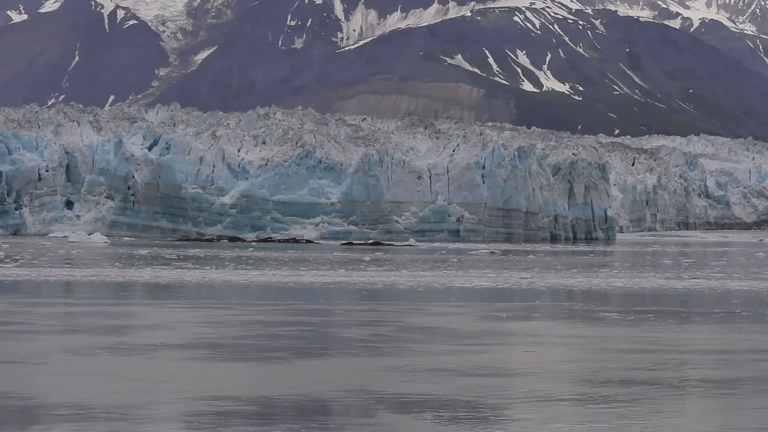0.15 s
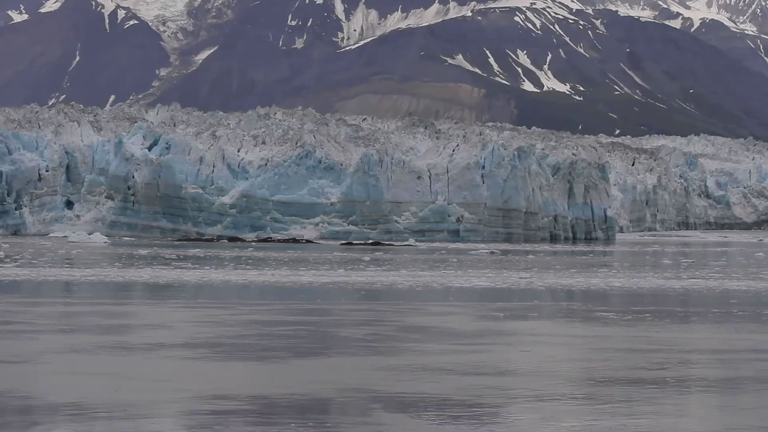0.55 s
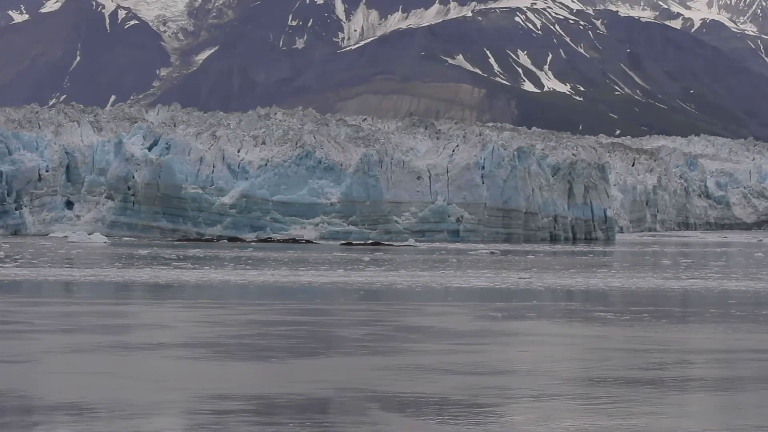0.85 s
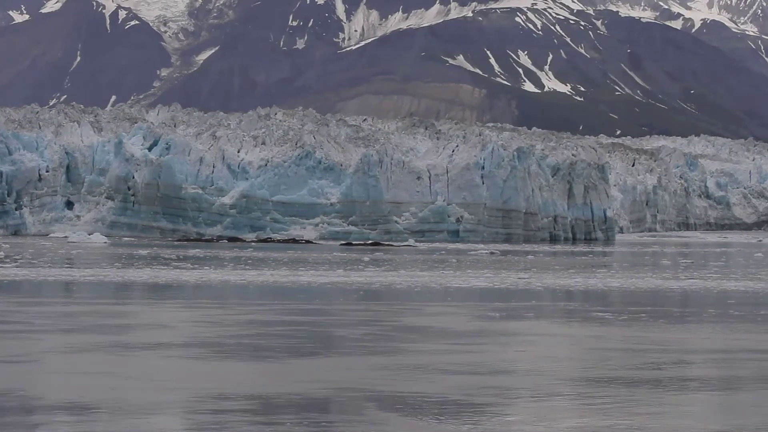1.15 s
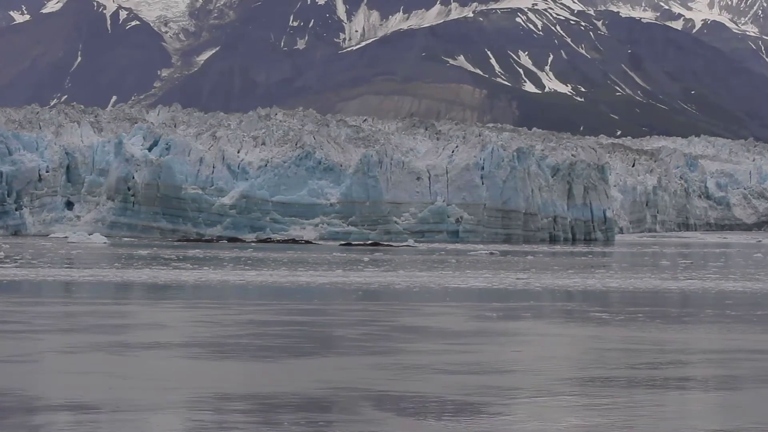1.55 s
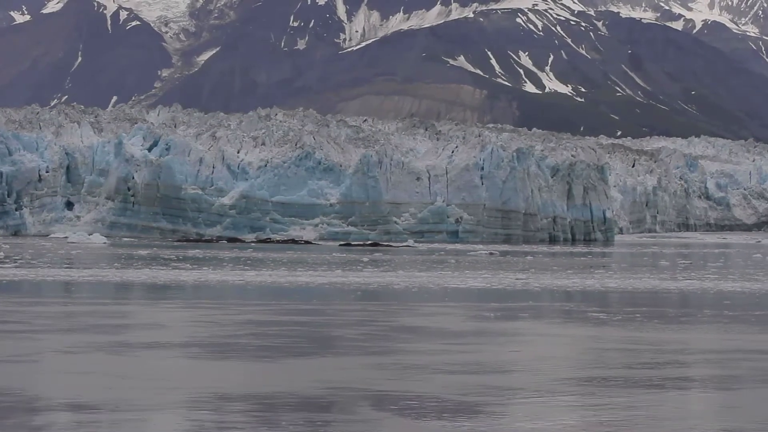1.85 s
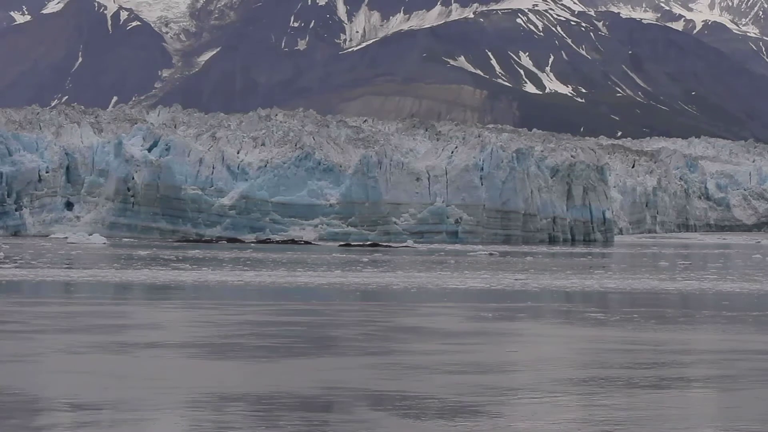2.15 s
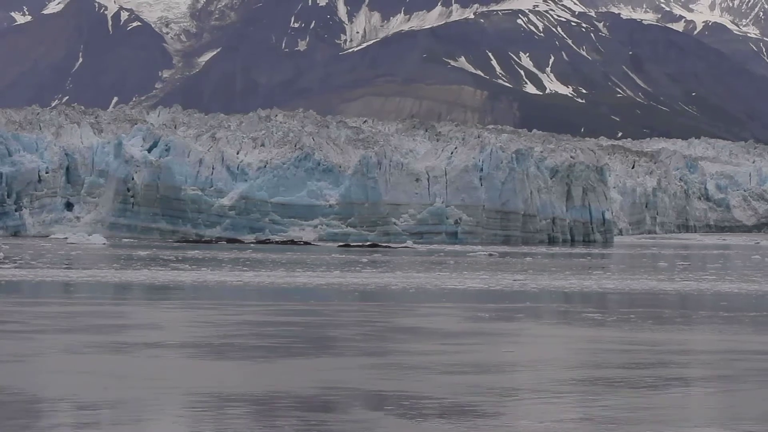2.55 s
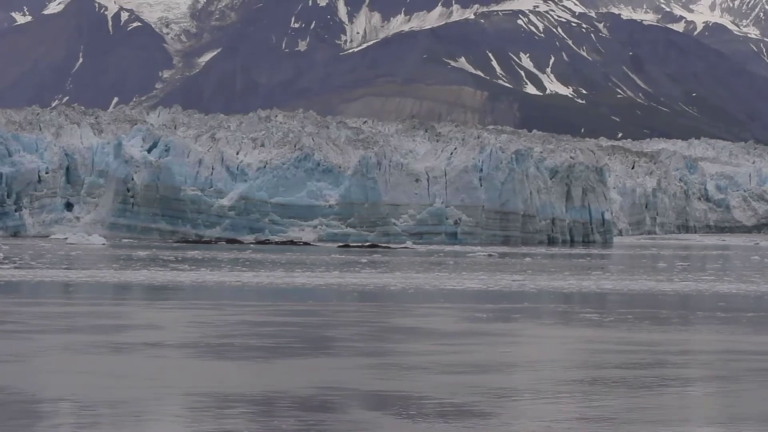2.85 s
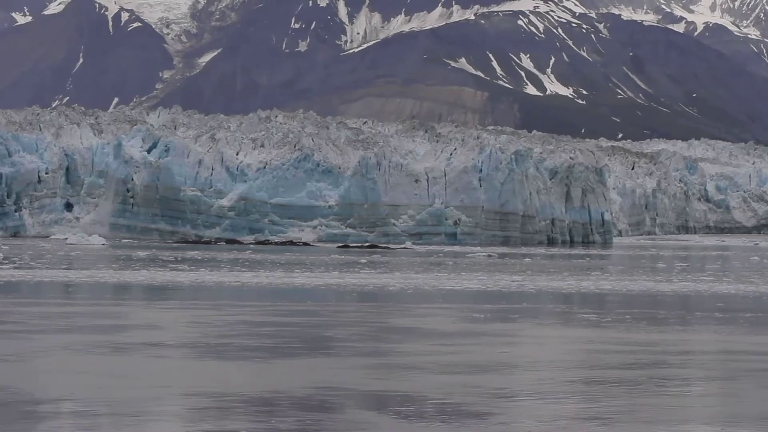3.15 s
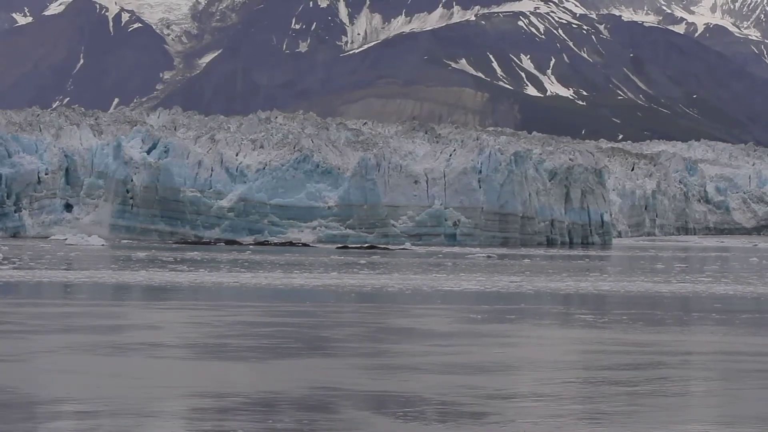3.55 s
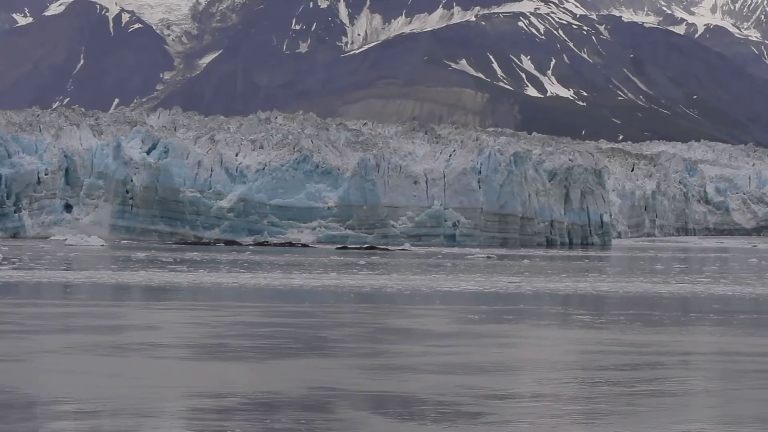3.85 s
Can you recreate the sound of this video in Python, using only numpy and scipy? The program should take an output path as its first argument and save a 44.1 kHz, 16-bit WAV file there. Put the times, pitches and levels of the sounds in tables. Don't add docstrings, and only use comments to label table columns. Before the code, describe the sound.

Glacier ice cracks and collapses in a deep roaring crash after a fading wash of water

```python
import sys
import numpy as np
from scipy import signal
from scipy.io import wavfile
from scipy.ndimage import uniform_filter1d

SR = 44100
rng = np.random.default_rng(int(sys.argv[2]) if len(sys.argv) > 2 else 0)


def makeup_ratio(level_db):
    decades = np.asarray(level_db, float) / 20
    return 10 ** decades


def wav_out(sig):
    wavfile.write(sys.argv[1], SR, np.round(np.clip(np.atleast_2d(sig).T, -1, 1) * 32767).astype(np.int16))


N = 176400
STORE_HZ = 11024

# time_s, level_db, near_roll_share (0-1)
WASH_LEVELS = [(0, -45, 0.63), (.08, -42.5, 0.76), (.6, -44.5, 0.68), (.78, -43, 0.72), (.93, -46.5, 0.6),
               (1, -48, 0.57), (1.08, -51, 0.69), (1.17, -54, 0.8), (1.3, -56, 0.8), (1.36, -50, 0.78),
               (1.6, -52.5, 0.5), (1.9, -55, 0.31), (2.3, -55.5, 0.25), (2.74, -54.5, 0.4)]
# pitch_hz, level_db (per Hz)
ROLL_TONE = [(21, -44), (35, -21), (113, -8), (160, -1.5), (459, -1), (2060, -13.5), (3700, -34),
             (4810, -70), (8140, -120)]
# pitch_hz, level_db (per Hz)
CALM_TONE = [(20, -27), (45, -0.5), (80, -2.5), (380, -7.5), (750, -4.5), (1060, -6), (2200, -10),
             (3700, -19), (4800, -61)]
# pitch_hz, likeness (0-1)
WASH_LIKENESS = [(60, 0.81), (380, 0.91), (2380, 0.36), (15000, 0.068)]
# start_s, peak_db, pitch_hz, length_cycles
BOOM_EVENTS = [(0.477, -38, 484, 11), (0.593, -39, 248, 4.4), (0.742, -33, 402, 6), (0.751, -43, 198, 4.2),
               (0.81, -42, 166, 3.65), (0.885, -41, 206, 4.8), (2.765, -42.5, 132.5, 4.4),
               (3.333, -24, 50.1, 6.5), (3.458, -37.5, 51.8, 6.5), (2.808, -46, 126.6, 4.9),
               (2.925, -45, 184, 5.9), (3.062, -36, 145.5, 5.7), (3.109, -25.5, 162.5, 5.4),
               (3.158, -25, 152, 2.6), (3.19, -29, 582, 16.2), (3.255, -24, 402.3, 10), (3.36, -27, 228, 7),
               (3.266, -22, 200, 6), (3.354, -25, 151, 5), (3.575, -23.5, 164.4, 5),
               (3.326, -23.5, 54.4, 1.6), (3.669, -29, 272.4, 16), (3.686, -24, 186.3, 6),
               (3.79, -26.5, 198.7, 7), (3.275, -37, 1910, 45), (3.226, -35.5, 188, 4.4),
               (3.26, -11, 140, 4.84), (3.288, -20, 82.7, 2.6), (3.317, -18.5, 142.8, 3.6),
               (3.346, -20.5, 69.8, 2.7), (3.368, -15.5, 117.7, 2.3), (3.4, -17.5, 115.3, 1.8),
               (3.424, -15.5, 137.7, 2.63), (3.467, -19, 115, 4.57), (3.486, -15, 146.6, 4.5),
               (3.519, -16.5, 94.2, 1.8), (3.548, -21, 130, 4.66), (3.646, -14.5, 105.2, 3),
               (3.675, -20, 121, 3.9), (3.723, -20.5, 104.5, 4.4), (3.772, -26, 109.2, 3.3),
               (3.818, -20, 103.6, 2.1), (3.879, -25, 80, 2.47), (3.95, -24.5, 96, 2.4)]
# start_s, peak_db, fade_s (by 60 dB), left_over_right_db, dullness_db (per octave)
CRACK_EVENTS = [(.736, -37.5, 0.52, 1.5, 0.5), (.849, -41.5, 0.38, 0, 3.5), (.897, -37, 0.26, 2, -1),
                (1.064, -44.5, 0.62, 2, 2), (1.375, -43, 0.3, -3, 2.5), (2.143, -45, 0.35, -7, -5.5),
                (2.762, -31.5, 0.3, 4.5, 2.5), (2.803, -35, 0.36, 5, -2.3), (2.813, -35, 0.37, 3.5, -2),
                (2.847, -40, 0.45, -4, 0), (2.924, -30.5, 0.3, 2.5, -1), (2.96, -35, 1, 9, -0.1),
                (3.065, -41, 0.43, 1, 2), (3.115, -33, 0.52, 4, 6.5), (3.159, -24.5, 0.33, 6.5, -0.8),
                (3.199, -23, 0.47, 4.5, 3), (3.229, -31, 0.29, 1, 1), (3.26, -19.5, 0.26, 3, 1.5),
                (3.312, -25, 0.63, -0.5, 5), (3.434, -24, 0.36, 4.5, 0.2), (3.474, -27, .3, 1, -1.5),
                (3.499, -24, .5, 2.5, 2.5), (3.631, -27, 0.47, -2.5, 1.5), (3.836, -27.5, 0.3, 0.5, 2)]
# pitch_hz, level_db (per Hz)
CRACK_TONE = [(40, -28.5), (110, -11.5), (180, -1), (330, 0.5), (480, -3), (930, -3.5), (1800, -16),
              (3700, -32), (4800, -60)]
# pitch_hz, likeness (0-1)
FALL_LIKENESS = [(60, 0.9), (300, 0.88), (950, 0.72), (3000, 0.6)]
# start_s, peak_db, length_s
TICK_EVENTS = [(.849, -35, .0004), (0.9, -31, 0.00055), (1.382, -40.5, 0.001), (2.761, -35, 0.00084),
               (2.804, -30.5, 0.00054), (2.926, -29, .0006), (3.158, -22.5, .0008), (3.206, -22, 0.00052),
               (3.313, -20.5, .0006), (3.427, -23, 0.0008), (3.631, -23, 0.00018), (3.838, -23, 0.00053),
               (3.851, -25, 0.0006)]
# time_s, level_db, left_over_right_db
ROAR_LEVELS = [
    (3.06, -64, -10),
    (3.15, -45.5, 7),
    (3.17, -36, 5.5),
    (3.2, -35, 5),
    (3.3, -33.5, 6),
    (3.55, -33.5, 3.5),
    (3.7, -34.5, 1),
    (3.9, -33.5, 1.5),
    (4, -31.5, 1.5),
]
# pitch_hz, level_db (per Hz)
RUBBLE_TONE = [(21, -44), (35, -14), (69, -5.5), (170, -5.5), (580, -14.5), (891, -19.5), (963, -26.5),
               (1170, -21.5), (3700, -39.5), (4810, -75), (8140, -120)]
# time_s, from_hz, to_hz
DROPPED_BANDS = [(2.892, 3350, 4000), (3.049, 3300, 4000), (3.101, 2950, 4000), (3.205, 2150, 2260),
                 (3.205, 2820, 2920), (3.257, 2150, 2260), (3.257, 2480, 2650), (3.257, 3050, 3200),
                 (3.31, 2900, 3000), (3.31, 920, 990), (3.31, 1330, 1430), (3.31, 2450, 2650),
                 (3.362, 910, 980), (3.362, 2750, 4000), (3.414, 1200, 1290), (3.414, 3450, 4000),
                 (3.466, 1200, 1290), (3.519, 3000, 4000), (3.571, 3000, 4000), (3.623, 3000, 3200),
                 (3.675, 2850, 4000), (3.727, 1240, 1330), (3.78, 2950, 4000), (3.832, 940, 1020),
                 (3.832, 1300, 1400), (3.832, 2130, 2230), (3.884, 940, 1020), (3.989, 2450, 4000),
                 (4.04, 2450, 4000)]


def evened(x):
    return x / np.sqrt(np.mean(x ** 2) + 1e-20)


def read(points, hz):
    table_hz, value = np.transpose(points)
    return np.interp(np.log(hz + 1), np.log(table_hz + 1), value)


def curve(table, column):
    rows = np.array(table)
    return np.interp(np.arange(N) / SR, rows[:, 0], rows[:, column])


def panned(left_over_right_db):
    return makeup_ratio(np.array([left_over_right_db / 2, -left_over_right_db / 2]))


def rush(tone, likeness, patchy_db, flicker_db, dull_db=0, length=N):
    frames = length // 256 + 5
    hz = np.fft.rfftfreq(1024, 1 / SR)[:120]
    a, b, c, d, patch, flicker = rng.standard_normal((frames, len(hz), 6)).T
    patch = uniform_filter1d(uniform_filter1d(patch, size=6, axis=0), size=10, axis=1)
    flicker = uniform_filter1d(uniform_filter1d(flicker, size=60, axis=0), size=3, axis=1)
    drift = makeup_ratio(patchy_db * evened(patch) + flicker_db * evened(flicker))

    octaves_up = np.log2(np.maximum(hz, 300) / 800)
    shape = makeup_ratio(read(tone, hz) - dull_db * octaves_up) * (hz > 20)
    middle = (hz > 300) & (hz < 2500)
    middle_share = np.sum(shape[middle] ** 2) / np.sum(shape ** 2)

    same = np.clip(read(likeness, hz), -1, 1)[:, None]
    left = a + 1j * b
    right = same * left + np.sqrt(1 - same ** 2) * (c + 1j * d)
    spectrum = np.zeros((2, 513, frames), complex)
    spectrum[:, :len(hz)] = np.array([left, right]) * shape[:, None] * drift
    noise = signal.istft(spectrum, nperseg=1024, noverlap=768)[1][:, :length]
    return evened(noise) / np.sqrt(middle_share)


def wash():
    near = np.clip(curve(WASH_LEVELS, 2), 0, 1)
    roll = rush(ROLL_TONE, WASH_LIKENESS, 0.76, 0.95)
    calm = rush(CALM_TONE, WASH_LIKENESS, 1.1, 0.59)
    blend = np.sqrt(near) * roll + np.sqrt(1 - near) * calm
    return makeup_ratio(curve(WASH_LEVELS, 1)) * blend * panned(0.57)[:, None]


def booms():
    glide, pan_db = 0.065, 3.5
    echo_fade_s, echo_likeness, echo_db = .3, 0.69, -11.5
    direct = np.zeros(N + SR)
    for start_s, peak_db, pitch_hz, cycles in BOOM_EVENTS:
        u = np.arange(0, 1, pitch_hz / cycles / SR)
        turns = cycles * (u - .55) * (1 + glide * (.5 - u))
        swell = np.sin(np.pi * u ** 1.2) ** 2
        direct[round(start_s * SR):][:len(u)] += makeup_ratio(peak_db) * swell * np.cos(2 * np.pi * turns)
    direct = direct[:N]

    t = np.arange(SR // 2) / SR
    left, other = rng.standard_normal((2, len(t))) * makeup_ratio(-60 * t / echo_fade_s) * (t > .004)
    right = echo_likeness * left + np.sqrt(1 - echo_likeness ** 2) * other
    echoes = np.array([left, right]) / np.linalg.norm(left)
    tail = signal.fftconvolve(direct[None], echoes, axes=1)[:, :N]
    return (direct + makeup_ratio(echo_db) * tail) * panned(pan_db)[:, None]


def cracks():
    rise_s, trim_db = 0.00098, -9.5
    snap, snap_s = .45, .006
    out = np.zeros((2, N + SR))
    t = np.arange(SR // 2) / SR
    attack = np.minimum(t / rise_s, 1) * (1 + snap * np.exp(-t / snap_s))
    for start_s, peak_db, fade_s, pan_db, dull_db in CRACK_EVENTS:
        shape = attack * makeup_ratio(peak_db + trim_db - 60 * t / max(fade_s, .02))
        burst = rush(CRACK_TONE, FALL_LIKENESS, 2.1, 2.2, dull_db, len(t))
        out[:, round(start_s * SR):][:, :len(t)] += shape * panned(pan_db)[:, None] * burst
    return out[:, :N]


def ticks():
    out = np.zeros(N + SR)
    for start_s, peak_db, length_s in TICK_EVENTS:
        u = np.arange(400) / SR / max(length_s, 5e-5)
        jump = np.minimum(u * 4, 1) * (1 - u) * np.exp(-u)
        out[round(start_s * SR):][:len(u)] += makeup_ratio(peak_db) * jump
    return out[:N] * panned(2.1)[:, None]


def roar():
    rise_s = 0.039
    start = np.clip((np.arange(N) / SR - ROAR_LEVELS[0][0]) / rise_s, 0, 1)
    level = start * makeup_ratio(curve(ROAR_LEVELS, 1) + 0.5)
    return level * panned(curve(ROAR_LEVELS, 2)) * rush(RUBBLE_TONE, FALL_LIKENESS, 1.3, 1.0)


def scene():
    return wash() + booms() + cracks() + ticks() + roar()


def squeeze(x):
    hop, grid, band_lines, edge_hz = 576, 200, 18, 3870
    step_base_db, step_follow, side_step_db, treble_step_db = -9.5, .6, -5, 2.5
    strain, strain_from_db = .03, -45
    wobble_db, rounding = 2.5, .4

    n, k = np.arange(2 * hop) + .5, np.arange(hop) + .5
    window = np.sin(np.pi * n / (2 * hop))[:, None]
    basis = window * np.cos(np.pi / hop * np.outer(n + hop / 2, k)) * np.sqrt(2 / hop)
    mid_side = np.array([x[0] + x[1], x[0] - x[1]]) / 2
    padding = (2 * hop - grid, 3 * hop + grid - x.shape[1] % hop)
    blocks = np.pad(mid_side, ((0, 0), padding)).reshape(2, -1, hop)
    lines = np.concatenate([blocks[:, :-1], blocks[:, 1:]], axis=2) @ basis
    count = len(lines[0])

    band_power = (lines[0] ** 2).reshape(count, -1, band_lines).mean(axis=2)
    band_db = 10 * np.log10(band_power + 1e-14)
    top_db = band_db.max(axis=1, keepdims=True)
    wobble = evened(uniform_filter1d(rng.standard_normal((2, *band_db.shape)), size=3, axis=1))
    step_db = step_base_db + top_db + strain * np.maximum(top_db - strain_from_db, 0)
    step_db = step_db + step_follow * (band_db - top_db)
    step_db = step_db + np.array([0, side_step_db])[:, None, None] + wobble_db * wobble
    step = makeup_ratio(np.repeat(step_db, band_lines, axis=2) + treble_step_db * (k / hop * 1.4) ** 2)

    hz = k * STORE_HZ / 2 / hop
    kept = np.tile(hz < edge_hz, (count, 1))
    for time_s, from_hz, to_hz in DROPPED_BANDS:
        kept[round((time_s * STORE_HZ - grid) / hop) + 1] &= (hz < from_hz) | (hz > to_hz)
    lines = np.sign(lines) * np.floor(abs(lines) / step + rounding) * step * kept

    halves = lines @ basis.T
    joined = (halves[:, 1:, :hop] + halves[:, :-1, hop:]).reshape(2, -1)
    mid, side = joined[:, hop - grid:][:, :x.shape[1]]
    return np.array([mid + side, mid - side])


def play_held(stored):
    edit_hz, slip, top_hz = 48000, 660, 15790
    held = np.arange(N * edit_hz // SR) * SR // edit_hz
    held = ((held - slip) * STORE_HZ) // SR + slip // 4
    held = np.clip(held, 0, stored.shape[1] - 1)
    played = signal.resample_poly(stored[:, held], SR, edit_hz, axis=1)[:, :N]
    lowpass = signal.firwin(1023, top_hz, window=("kaiser", 9), fs=SR)
    return signal.oaconvolve(played, lowpass[None], "same")


def low_pass(x):
    return signal.sosfilt(signal.butter(12, 16200, fs=SR, output="sos"), x)


def record(dry):
    limit, mic_low_hz = .3, 43.8
    softened = limit * np.tanh(dry / limit)
    bass_cut = signal.butter(2, mic_low_hz, "high", fs=SR, output="sos")
    heard = signal.sosfilt(bass_cut, softened)
    stored = squeeze(signal.resample(heard, N * STORE_HZ // SR, axis=1))
    return low_pass(play_held(stored))


dry = scene()
out = record(dry)
wav_out(out)
```